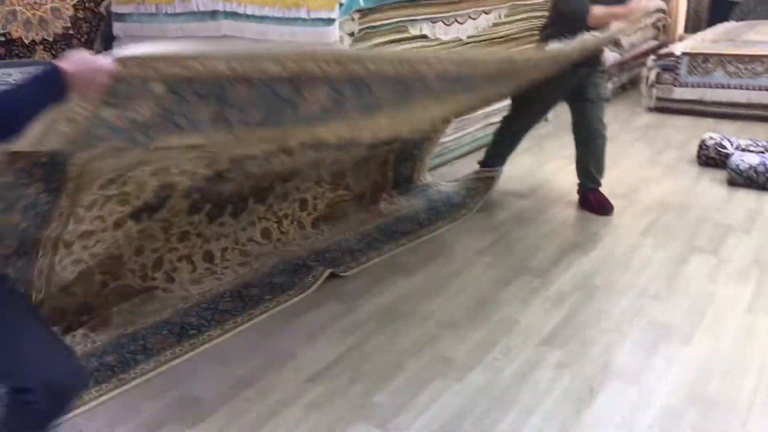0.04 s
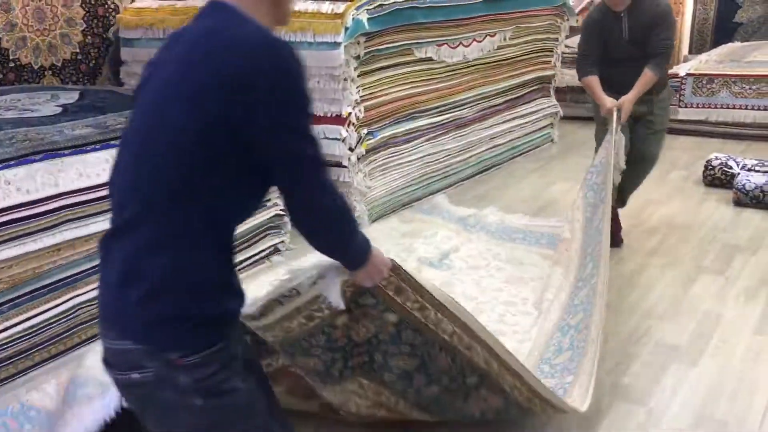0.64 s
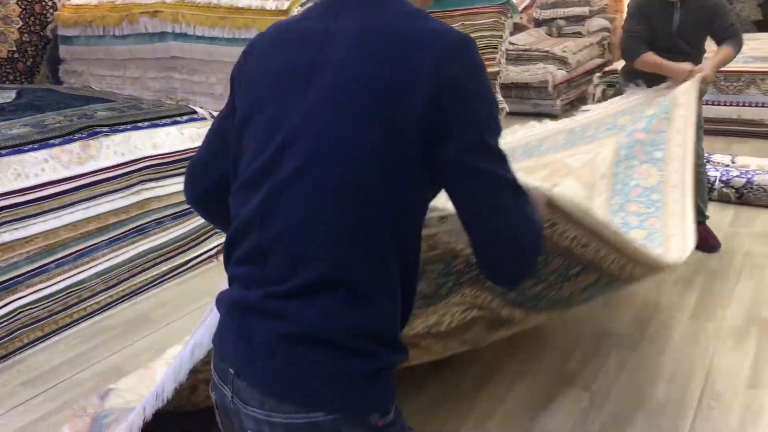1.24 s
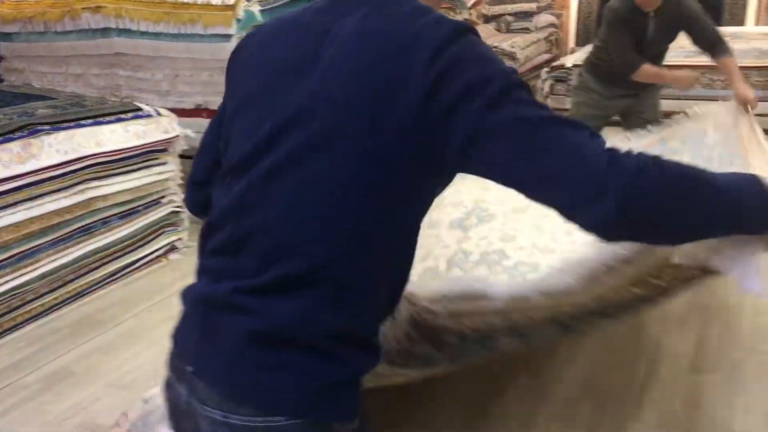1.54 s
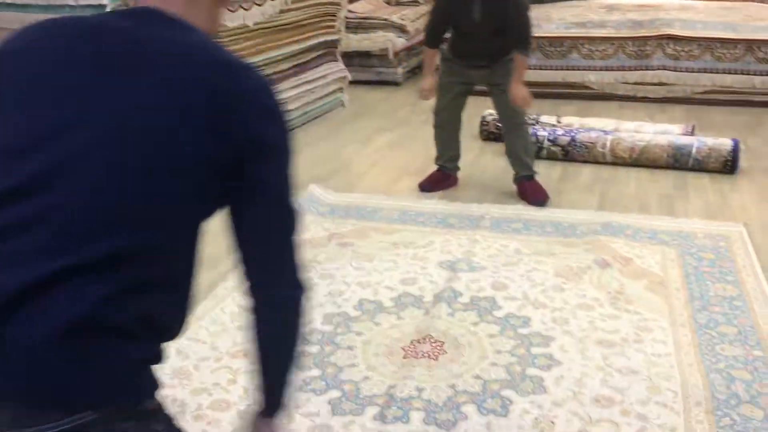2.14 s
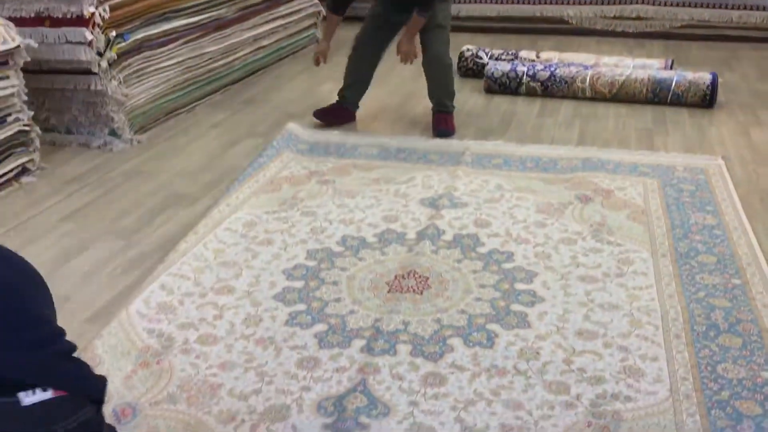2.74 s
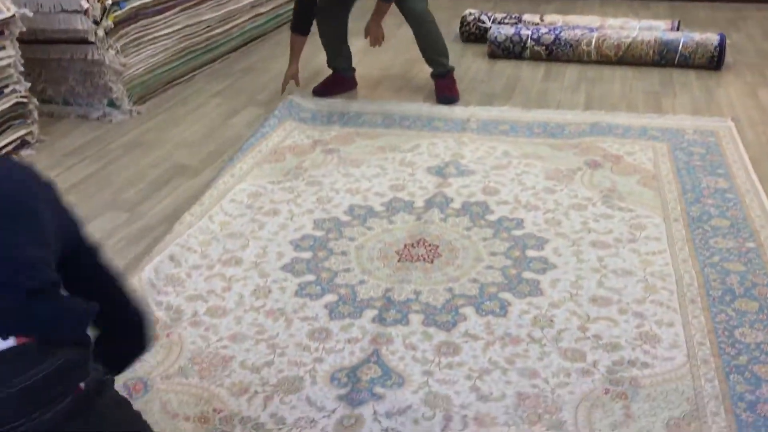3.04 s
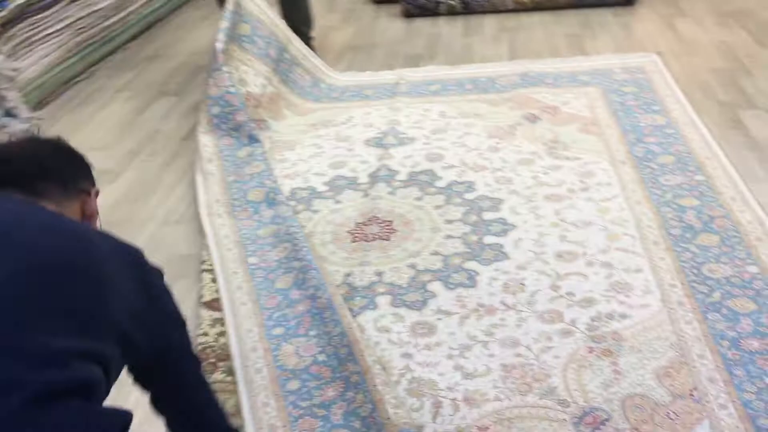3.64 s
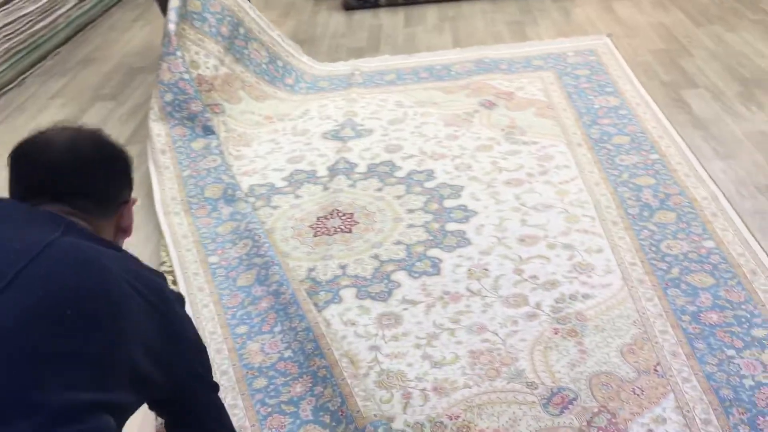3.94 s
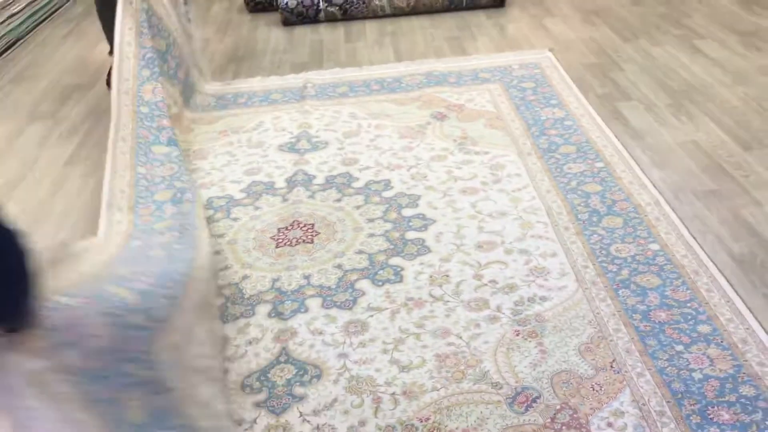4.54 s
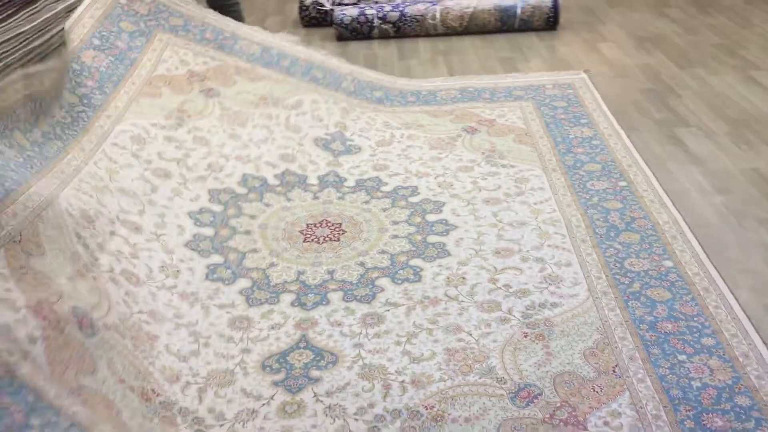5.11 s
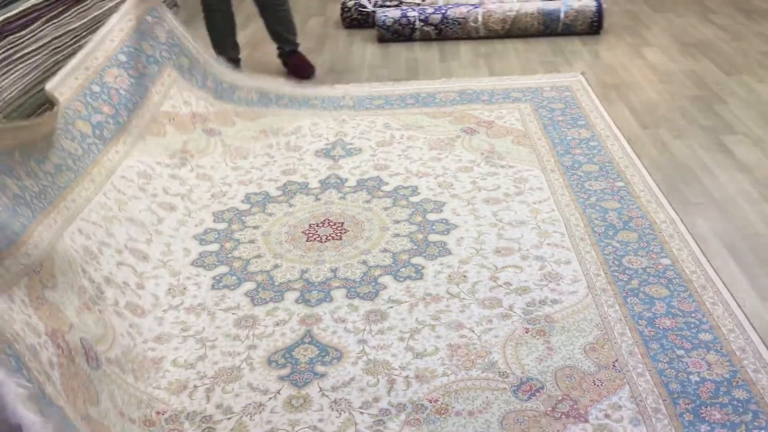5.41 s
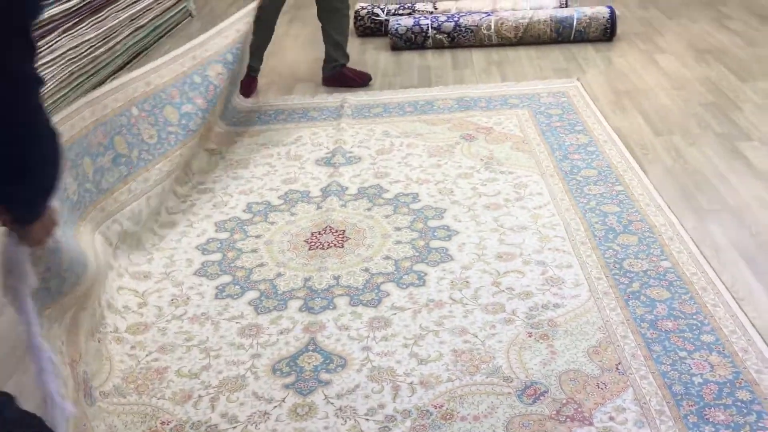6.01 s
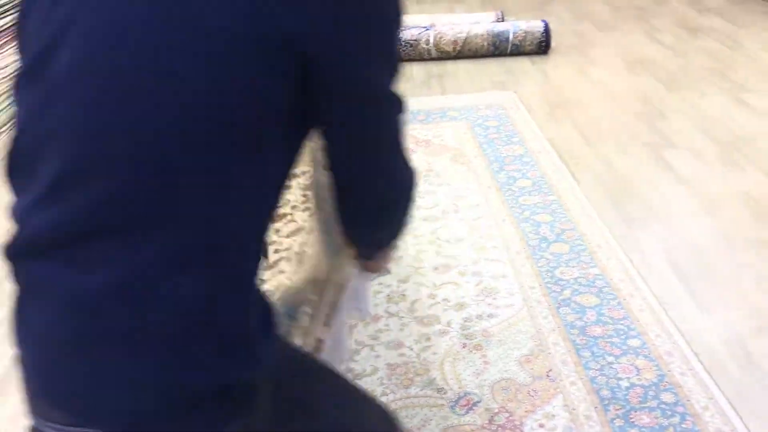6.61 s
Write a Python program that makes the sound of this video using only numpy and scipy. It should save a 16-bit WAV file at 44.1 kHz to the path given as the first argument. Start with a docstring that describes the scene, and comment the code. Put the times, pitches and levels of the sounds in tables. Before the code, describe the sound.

Large carpets are turned over in a quiet showroom, heard from nearby. Each lands on the hard floor with a deep puff of trapped air and a flat slap: one almost immediately, then a double fall, then two single ones a couple of seconds apart. Between the landings come much quieter dragging, rustling, fringe swishes, short scrapes and soft footsteps, over a low room rumble.

```python
"""Two men flip heavy carpets in a showroom. Cloth slaps down at once, and a carpet falls flat near 0.5 s:
in a quick run of contacts trapped air thumps, the backing slaps, the edge cracks, and the room answers.
Fringes swish, feet step softly and cloth drags and rustles until a double fall around 2 s. Another
lands at 3.5 s; a shoe scuff, steps, pulls and scrapes of the backing lead to the last fall at 5.5 s.
The scene ends on a few light pulls and a small slap, over the low room rumble heard throughout."""
import sys
import numpy as np
from scipy import signal
from scipy.fft import rfft, irfft, next_fast_len
from scipy.io import wavfile
from scipy.ndimage import uniform_filter1d, map_coordinates

SR = 44100
rng = np.random.default_rng(int(sys.argv[2]) if len(sys.argv) > 2 else 0)


def int16_out(signal):
    """Quantize to a 16-bit WAV file."""
    q = np.round(np.clip(np.atleast_2d(signal).T, -1, 1) * 32767)
    wavfile.write(sys.argv[1], SR, q.astype(np.int16))


N = 298461
TIME = np.arange(N) / SR


# carpet hits, one per stretch meeting the floor: t/s, thump/dB, slap/dB, edge crack/dB, length/s
CARPET_HITS = [(.001, -33, -35.5, -43, 0.035), (.043, -35, -34.5, -52, 0.023),
               (.064, -27, -39, -48.5, 0.012), (.079, -31.5, -39, -51, .05), (.299, -60, -43, -53, 0.023),
               (.31, -52, -78, -47.5, 0.0084), (.424, -32.5, -53.5, -77, 0.014),
               (.435, -28, -32, -61, 0.0015), (.438, -22.5, -31.5, -48, 0.0036),
               (.443, -25, -20.5, -55, 0.009), (.454, -32, -21, -39.5, 0.0057),
               (.61, -28.5, -61, -69, 0.08), (1.897, -40.5, -35.5, -48, 0.1),
               (1.945, -18.5, -22, -47, 0.021), (2.002, -36, -26, -47, 0.0012),
               (2.009, -19.5, -27, -64, 0.015), (2.067, -16.5, -33, -45, 0.024),
               (2.119, -44, -28.5, -36, 0.11), (2.146, -21.5, -30, -27.5, 0.0055),
               (2.173, -20.5, -51.5, -45, 0.01), (3.504, -33.5, -55.5, -45, 0.0014),
               (3.524, -18.5, -22, -30.5, 0.0036), (3.529, -17, -23, -43, 0.0091),
               (3.574, -25, -45, -56, .015), (3.727, -52, -72, -59.5, 0.0022),
               (5.51, -12.5, -24, -66, 0.011), (5.516, -22, -24.5, -53.5, 0.023),
               (5.524, -30, -30, -54, 0.036), (6.757, -52.5, -39.5, -72, 0.059)]
def landings():
    """The carpet slaps down stretch by stretch; after each full fall its loose folds patter down."""
    folds = [(s + 0.034, db - 21.5, db - 22, db - 42, 0.052) for s, _, db, _ in FLAT_FALLS]
    return contacts(CARPET_HITS + folds, ring_db=-38, thump_room_db=-9.5, patter_room_db=-7.5)


# body of a whole carpet falling flat on its air cushion: t/s, f/Hz, level/dB, t60/s
FLAT_FALLS = [(.463, 120.3, -17.5, 0.11), (1.958, 115.2, -15.5, 0.17), (2.148, 195.4, -16.5, 0.25),
              (3.537, 141.6, -13, 0.085), (5.511, 176, -20.5, .05)]
def cushions():
    """The trapped air drums in two modes and rebounds once, and the floor booms below."""
    drums = []
    for s, hz, db, t60 in FLAT_FALLS:
        drums += [(s, hz, db, t60),
                  (s - 0.00764, hz * 1.616, db - 10.5, 0.079),  # the second mode speaks sooner
                  (s + 0.062, hz * 1.15, db - 9.5, t60),  # the thinner cushion drums again, higher
                  (s, 53, db - 16.5, 0.3)]  # the floor gives under the weight
    return rings(drums, attack_s=0.0064, rough=0.05, room_db=-13.5)


# tone of the backing's slap: f/Hz, relative level/dB
SLAP_EQ = [(100, -39.5), (300, 11.5), (470, -8.5), (650, -1), (1100, -4.5), (1750, -10), (2400, -18),
           (4000, -32), (5500, -50), (9000, -59.5), (16000, -79)]
def contacts(rows, ring_db, thump_room_db, patter_room_db):
    """Each contact thumps, slaps, cracks and wakes the room; more trapped air makes a slower push."""
    out, t = np.zeros(N), np.arange(-SR // 20, SR // 3) / SR
    backing = blow(two_faced(causal(SLAP_EQ), delay_s=0.00399, share=0.047))
    for s, thump_db, slap_db, crack_db, length_s in rows:
        push_s = 0.0008 * 2 ** ((thump_db - slap_db) / 22)
        edge = edge_colour(crack_db)
        low = amp(thump_db) * thump(t, push_s, ring_db)
        slap = patter(t, length_s, backing, snap_s=0.005, grain_db=6, lead_db=-18, lead_s=0.008)
        crack = patter(t, length_s, edge, snap_s=0.0035, grain_db=2, lead_db=-27, lead_s=0.007)
        add(out, s + t[0], amp(slap_db) * slap + amp(crack_db) * crack - low)
        add(out, s + t[0], amp(thump_room_db) * signal.fftconvolve(low, room_tail(build_s=0.0074)))
        send = amp(patter_room_db) * (amp(slap_db) * backing + amp(crack_db) * edge)
        # a longer contact fills the room more gradually
        add(out, s, signal.fftconvolve(send, room_tail(build_s=0.0018 + length_s / 2)))
    return out


# ring of the floor and the air above it: f/Hz, relative level/dB, t60/s
FLOOR_MODES = [(50.5, -44.5, 0.69), (93, -7, 0.13), (126.8, -16.5, 0.52), (155.8, -4, 0.092),
               (183, -16.5, 0.22), (245.8, -6, 0.14), (297.7, -6.5, 0.068), (361.5, -17.5, 0.19),
               (604, -12, 0.22), (966, -22.5, 0.078)]
def thump(t, push_s, ring_db):
    """Air squeezed from under the cloth: a soft push and its rebound set the floor ringing."""
    u = np.maximum(t, 0) / push_s
    push = np.gradient(np.gradient(u ** 4 * np.exp(-2 * u)))
    age = t - t[0]
    modes = sum(amp(db - 60 * age / t60) * np.cos(2 * np.pi * hz * age) for hz, db, t60 in FLOOR_MODES)
    return blow(push + amp(ring_db) * signal.fftconvolve(push, modes)[:len(t)])


def patter(t, length_s, colour, snap_s, grain_db, lead_db, lead_s):
    """Air rushes from the closing gap, then patches of cloth touch down; a short contact is one snap."""
    patches = np.repeat(rng.standard_normal(len(t)), SR // 1000)[:len(t)]
    u = np.maximum(t, 0) / length_s
    settle = (1 - np.exp(-8 * u)) * np.exp(-2 * u)
    rush = amp(lead_db) * np.exp(-np.abs(t) / lead_s)
    touches = rng.standard_normal(len(t)) * amp(grain_db * patches) * (settle + rush)
    snap = np.diff(t > 0, prepend=False) * (snap_s / length_s) ** 2
    return blow(signal.fftconvolve(touches / np.linalg.norm(touches) - snap, colour)[:len(t)])


def two_faced(sound, delay_s, share):
    """The carpet's far face radiates in opposite phase, and its sound arrives a little later."""
    t = np.arange(len(sound)) / SR
    return sound - share * np.interp(t - delay_s, t, sound, left=0)


# bite of the bound edge: f/Hz, relative level/dB
CRACK_EQ = [(400, -7.5), (1500, 14.5), (2800, 5), (4200, 1), (6500, -9.5), (9000, -20), (10400, -31),
            (12000, -27.5), (16000, -40.5)]
def edge_colour(crack_db):
    """The harder the edge whips the floor, the brighter it cracks."""
    tilt = np.clip(0.45 * (crack_db + 38), -5, 5)  # dB per octave above 4500 Hz
    return blow(causal([(hz, db + tilt * max(np.log2(hz / 4500), 0)) for hz, db in CRACK_EQ]))


# pull cues: middle t/s, half-width/s, drag/dB, rustle/dB
PULL_CUES = [(0.33, 0.75, -60, -66), (0.75, 0.2, -64, -55), (1.265, 1, -51, -62.5),
             (1.812, 0.24, -54.5, -56.5), (2.444, 0.23, -66, -59.5), (2.945, 1, -64.5, -71.5),
             (3.389, 0.31, -59.5, -56), (4.09, 1, -64, -67), (4.795, 0.26, -55.5, -52.5),
             (5.023, 0.12, -56, -60), (6.158, 0.45, -73.5, -71.5), (6.641, 0.11, -59.5, -60)]
# dark drag and bright rustle: f/Hz, relative level/dB
DRAG_EQ = [(80, -11.5), (200, 2.5), (400, -1.5), (900, -3.5), (1500, -9), (3000, -26.5), (8000, -42.5)]
RUSTLE_EQ = [(500, -6.5), (1400, 7), (2200, 6), (4200, 0), (5000, -6), (7000, -5.5), (10300, -15.5),
             (12000, -17.5), (16000, -22)]
def pulls():
    """Each pull swells and fades: carpet drags over carpet while its pile and the men's sleeves rustle."""
    drag, rustle = np.zeros(N), np.zeros(N)
    for s, width_s, drag_db, rustle_db in PULL_CUES:
        speed = np.exp(-2 * np.abs((TIME - s) / width_s) ** 1.33)  # a fairly pointed swell
        drag = np.hypot(drag, amp(drag_db) * speed)
        rustle = np.hypot(rustle, amp(rustle_db) * speed)
    drag *= noise(DRAG_EQ, patchy_db=1)
    shimmer = amp(0.8 * wobble(70))
    return drag + rustle * shimmer * noise(RUSTLE_EQ, patchy_db=1)


# footfalls: t/s, heel thump/dB, sole slap/dB, click/dB
FOOTFALLS = [(0.788, -49, -53, -71), (.986, -51, -56.5, -68), (1.19, -57, -52.5, -60),
             (1.681, -41.5, -68.5, -91), (2.726, -48, -62.5, -89), (4.027, -59, -57, -61.5),
             (4.246, -79, -70, -85), (4.283, -58, -57, -77), (4.535, -62, -52, -69),
             (5.176, -42, -56.5, -73), (6.111, -63, -64.5, -68.5)]
def steps():
    """Soft shoes: a dull heel, a brief slap of the sole and a small click."""
    sole_contact_s = 0.0048
    rows = [(*step, sole_contact_s) for step in FOOTFALLS]
    return contacts(rows, ring_db=-39, thump_room_db=-5.5, patter_room_db=-5.5)


# fringe sweeps: start t/s, length/s, level/dB
SWISH_CUES = [(0.594, 0.24, -50.5), (0.676, .13, -62), (1.125, 0.13, -56.5), (2.207, .042, -49),
              (2.779, 0.047, -60), (4.268, 0.17, -65), (4.894, 0.13, -55.5), (5.707, 0.023, -63.5)]
# airy top of the threads: f/Hz, relative level/dB
FRINGE_EQ = [(1000, -3.5), (2500, 4), (3800, 8), (7000, 2), (9000, -0.5), (10400, -7.5), (12000, -4),
             (16000, -12.5)]
def swishes():
    """Fringes brush past in bright strokes, with single threads flicking out of the hiss."""
    level = np.zeros(N)
    for s, length_s, db in SWISH_CUES:
        arch = np.sin(np.linspace(0, np.pi, int(length_s * SR)))
        add(level, s, amp(db + 3.5 * (arch - 1.5)))
    impulses = (rng.random(N) < 500 / SR) * rng.laplace(size=N)  # about 500 flicks a second
    flicks = signal.fftconvolve(impulses, causal(FRINGE_EQ))[:N]
    threads = unit(noise(FRINGE_EQ, patchy_db=-1) + 0.58 * unit(flicks))
    shimmer = amp(0.8 * wobble(60))
    return uniform_filter1d(level, size=200) * shimmer * threads


# short scrapes of the stiff backing, and one low squeaky shoe scuff near 3.9 s:
# middle t/s, half-width/s, centre f/Hz, level/dB
RASP_CUES = [(0.856, 0.033, 2650, -56), (3.124, .077, 1840, -60), (3.939, 0.034, 490, -54.5),
             (4.331, 0.06, 2460, -61.5), (4.715, 0.062, 1810, -47.5), (4.83, 0.1, 1930, -53.5),
             (6.286, .041, 2280, -60.5), (6.629, 0.052, 3520, -61.5)]
def rasps():
    """Each scrape or scuff is a brief, grainy band of friction noise around its own pitch."""
    out = np.zeros(N)
    for s, width_s, hz, db in RASP_CUES:
        band = [(hz * 2.0 ** octave, -15.5 * abs(octave)) for octave in range(-3, 4)]
        swell = np.exp(-2 * ((TIME - s) / width_s) ** 2)
        out += amp(db) * swell * noise(band, patchy_db=-1)
    grain = amp(0.42 * wobble(98) + 1.2 * wobble(38))
    return out * grain


# tiny bright accents: t/s, f/Hz, level/dB, t60/s
TICK_CUES = [(2.795, 11000, -61, 0.034), (4.482, 7570, -63, 0.11)]
def ticks():
    """Small hard things tick with a brief, rough ring."""
    return rings(TICK_CUES, attack_s=0.0004, rough=0.35, room_db=-5)


# showroom reverb time: f/Hz, t60/s
ROOM_DECAY = [(60, 0.69), (130, 0.57), (300, 0.38), (1000, 0.39), (2500, 0.41), (5000, 0.3), (12000, 0.18)]
def room_tail(build_s):
    """A fresh diffuse echo of energy 1: it builds as the walls answer, and the treble dies first."""
    hz, t, z = signal.stft(rng.standard_normal(SR * 3 // 4), SR, nperseg=512)
    decay = amp(-60 * t / along(ROOM_DECAY, hz)[:, None])
    tail = signal.istft(z * decay, SR, nperseg=512)[1]
    tail *= 1 - np.exp(-(np.arange(len(tail)) / SR / build_s) ** 2)
    return tail / np.linalg.norm(tail)


# room tone, low bed and faint air: f/Hz, relative level/dB
RUMBLE_EQ = [(15, -24.5), (30, -10.5), (40, 5.5), (52, 9), (75, -4.5), (130, -7.5), (250, -21), (450, -34),
             (1500, -43.5), (4000, -93)]
HISS_EQ = [(60, 3.5), (250, 5), (450, -7.5), (1000, -6), (2500, -15), (6000, -17.5), (9000, -20.5),
           (10300, -23.5), (12000, -23.5), (16000, -25.5)]
def room_tone():
    """An uneven low rumble and a steady faint hiss fill the hall."""
    sway = amp(1.2 * wobble(5))
    return amp(-53) * sway * noise(RUMBLE_EQ) + amp(-62.5) * noise(HISS_EQ, patchy_db=2.5)


def rings(rows, attack_s, rough, room_db):
    """Single damped resonances with a wandering phase, and their echo."""
    out, t = np.zeros(N), np.arange(SR // 3) / SR
    for s, hz, db, t60 in rows:
        drift = rough * np.cumsum(rng.standard_normal(len(t))) * np.sqrt(hz / SR)
        envelope = amp(-60 * t / t60) * (1 - np.exp(-t / attack_s))
        ring = amp(db) * blow(np.sin(2 * np.pi * hz * t + drift) * envelope)
        add(out, s, ring)
        add(out, s, amp(room_db) * signal.fftconvolve(ring, room_tail(build_s=0.011)))
    return out


def noise(spectrum, patchy_db=0):
    """Coloured noise of rms 1; its bands swell and fade in small random patches."""
    hz, _, z = signal.stft(rng.standard_normal(N), SR, nperseg=1024)
    patches = uniform_filter1d(rng.standard_normal(z.shape), size=5, axis=0)
    patches = uniform_filter1d(patches, size=5, axis=1)
    gain = amp(along(spectrum, hz)[:, None] + patchy_db * unit(patches))
    return unit(signal.istft(z * gain, SR, nperseg=1024)[1][:N])


def causal(spectrum, size=2048):
    """The tightest impulse response with this spectrum (minimum phase)."""
    gain = amp(along(spectrum, np.fft.rfftfreq(size, 1 / SR)))
    cepstrum = irfft(np.log(gain))
    cepstrum[1:size // 2] *= 2
    cepstrum[size // 2 + 1:] = 0
    return irfft(np.exp(rfft(cepstrum)))


def wobble(rate):
    """A smooth random curve, rate knots a second."""
    return map_coordinates(rng.standard_normal(int(N * rate / SR) + 4), [TIME * rate])


def along(points, hz):
    """Read a curve of (f/Hz, value) points on a log axis."""
    f, v = np.transpose(points)
    return np.interp(np.log(hz + 1), np.log(f + 1), v)


def amp(db):
    """Decibels to gain."""
    return 10 ** (np.asarray(db) / 20)


def unit(x):
    """Scale to rms 1."""
    return x / np.sqrt(np.mean(x ** 2) + 1e-20)


def blow(x):
    """Scale a hit to the energy of 20 ms at rms 1."""
    return x / np.sqrt(np.sum(x ** 2) / (0.02 * SR) + 1e-20)


def add(track, s, sound):
    """Mix a sound into the track at time s."""
    at = round(s * SR) + np.arange(len(sound))
    inside = (at >= 0) & (at < N)
    track[at[inside]] += sound[inside]


def scene():
    """Landings, steps and cloth over the quiet showroom, in mono."""
    hits = ticks() + landings() + cushions() + steps()
    return (hits + pulls() + swishes() + rasps() + room_tone())[None]


def record(dry):
    """A low cut at 34 Hz sheds the deepest bass; a brick wall tops the mix at 15.9 kHz."""
    lean = signal.sosfilt(signal.butter(3, 34, "highpass", fs=SR, output="sos"), dry)
    size = next_fast_len(N + 8192)
    passband = np.fft.rfftfreq(size, 1 / SR) < 15900
    return irfft(rfft(lean, size) * passband, size)[:, :N]


dry = scene()
out = record(dry)
int16_out(out)
```